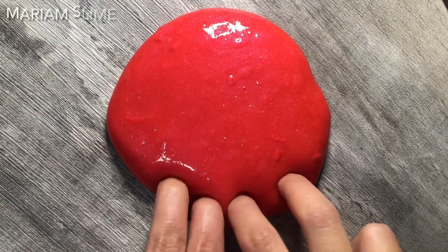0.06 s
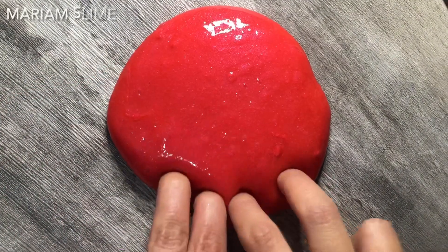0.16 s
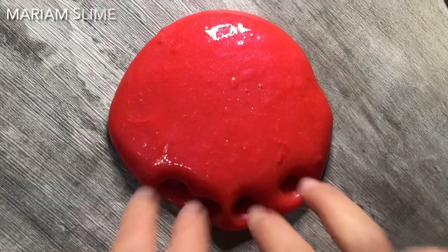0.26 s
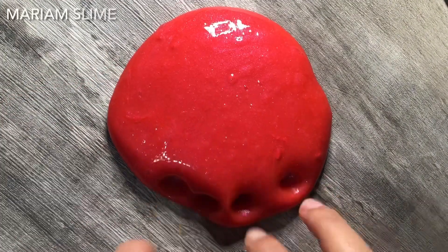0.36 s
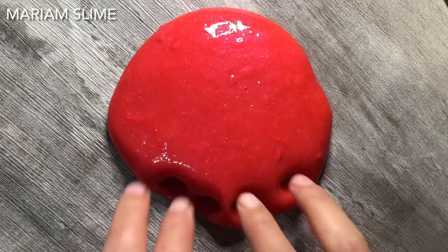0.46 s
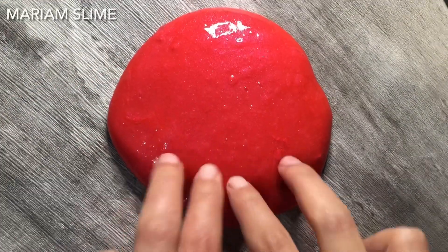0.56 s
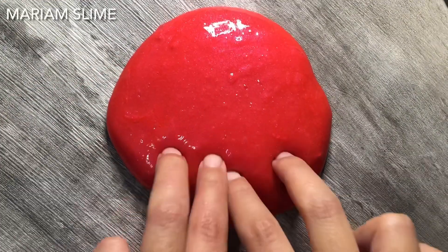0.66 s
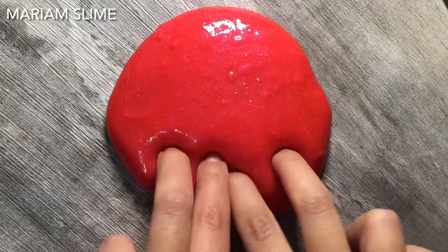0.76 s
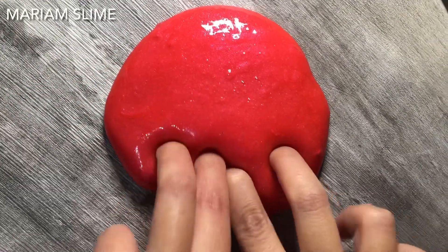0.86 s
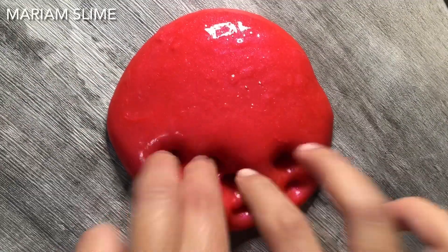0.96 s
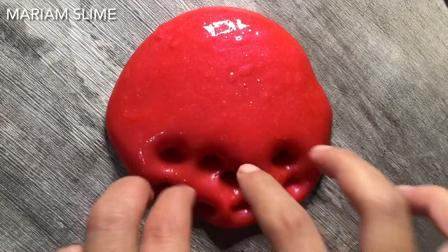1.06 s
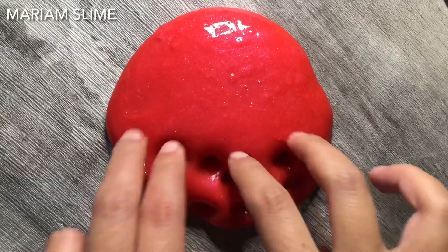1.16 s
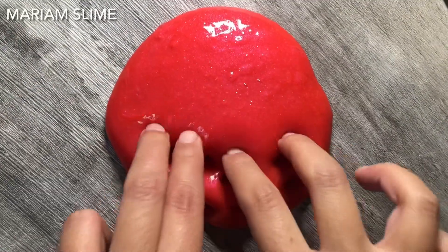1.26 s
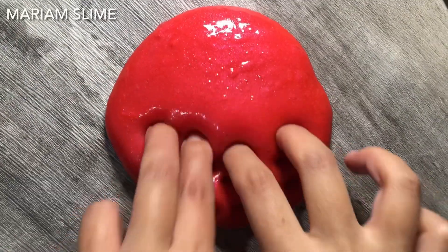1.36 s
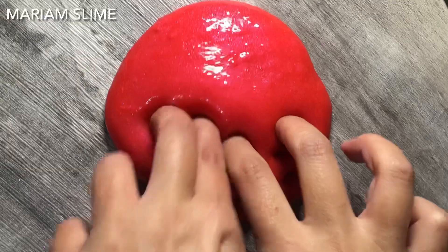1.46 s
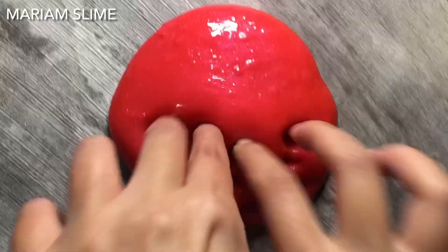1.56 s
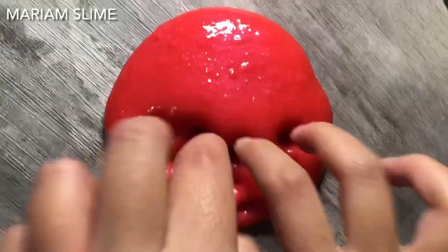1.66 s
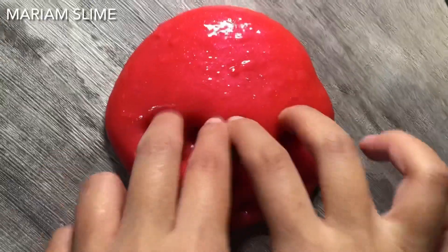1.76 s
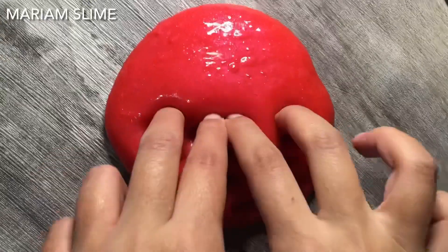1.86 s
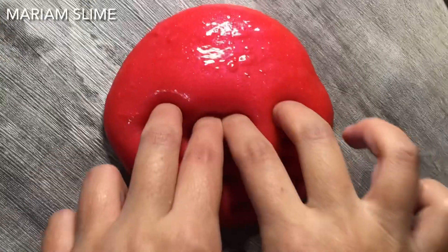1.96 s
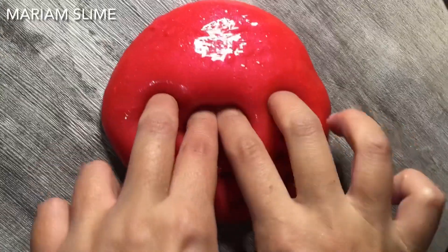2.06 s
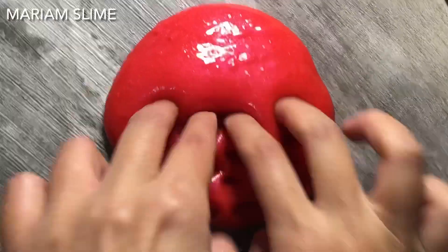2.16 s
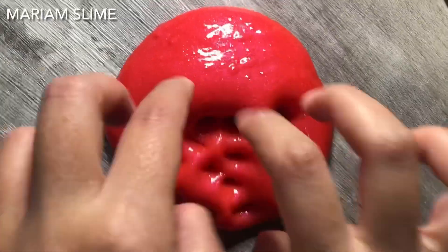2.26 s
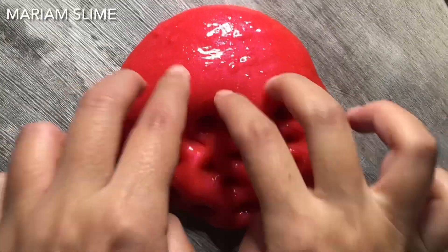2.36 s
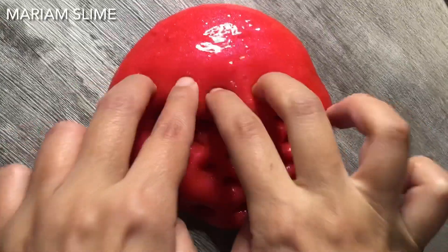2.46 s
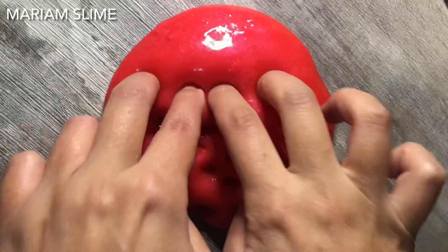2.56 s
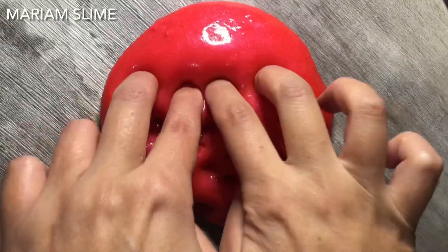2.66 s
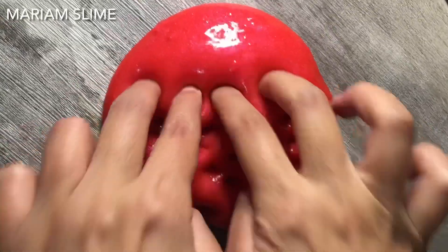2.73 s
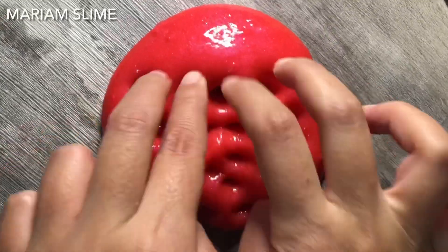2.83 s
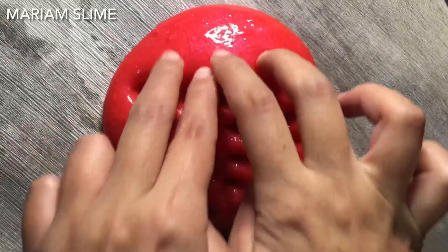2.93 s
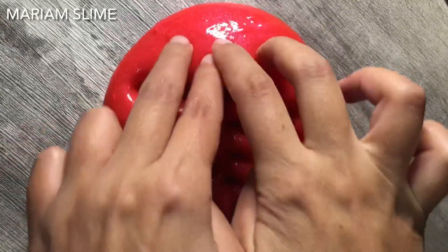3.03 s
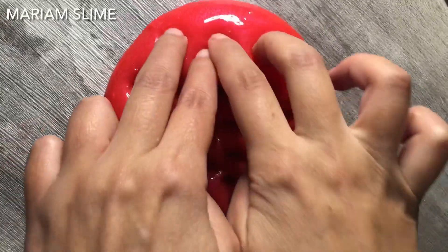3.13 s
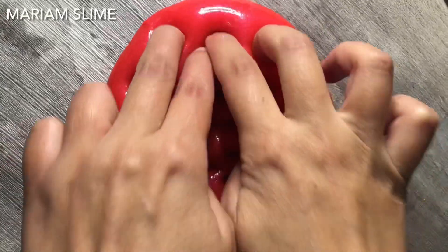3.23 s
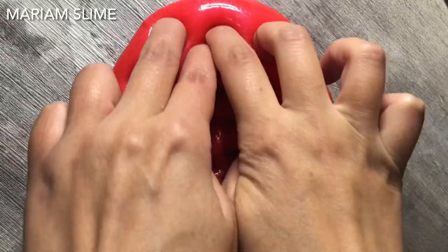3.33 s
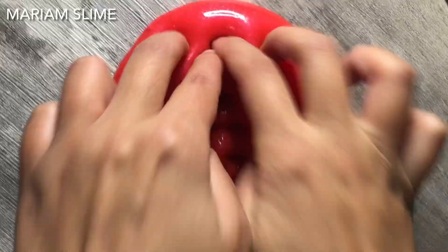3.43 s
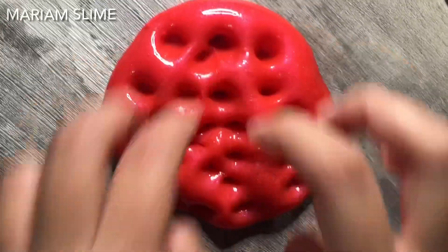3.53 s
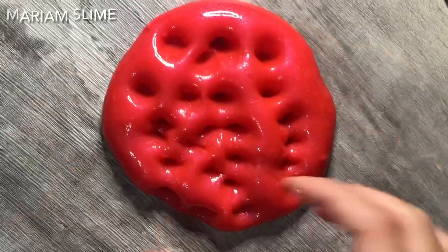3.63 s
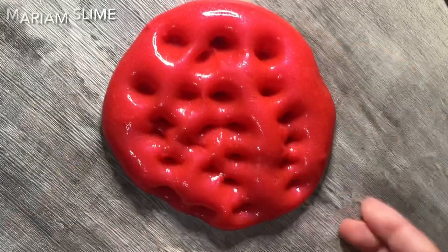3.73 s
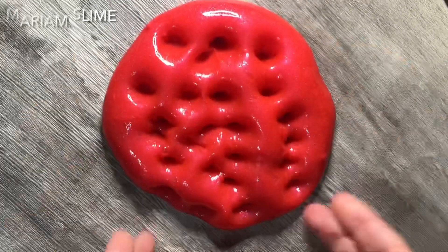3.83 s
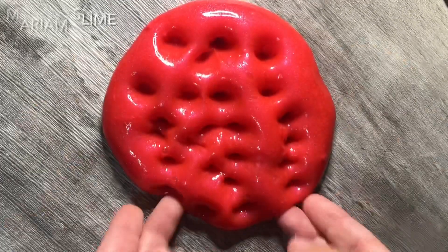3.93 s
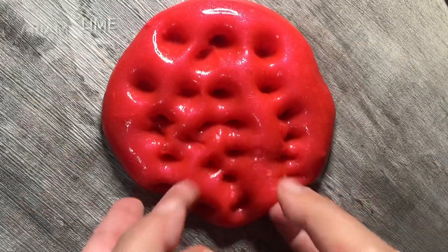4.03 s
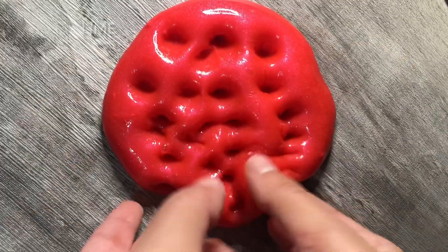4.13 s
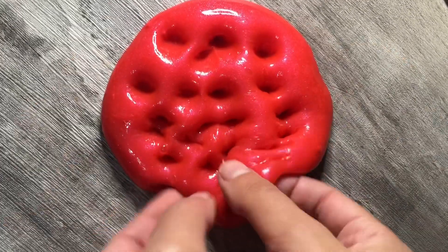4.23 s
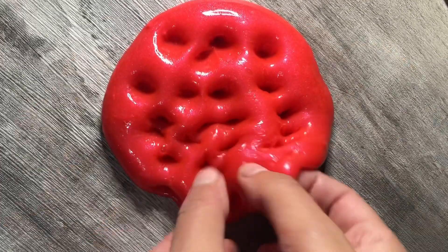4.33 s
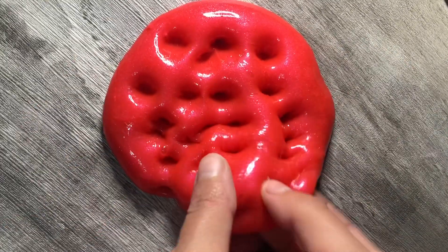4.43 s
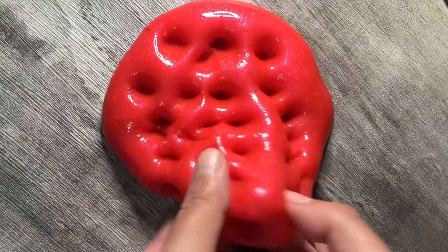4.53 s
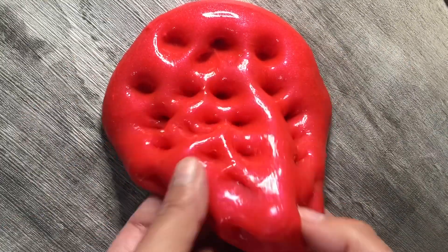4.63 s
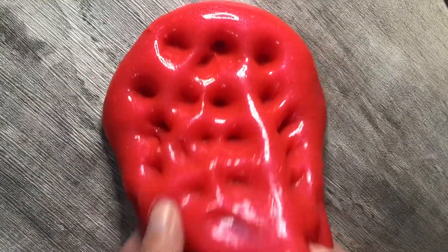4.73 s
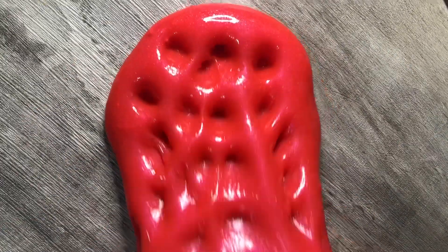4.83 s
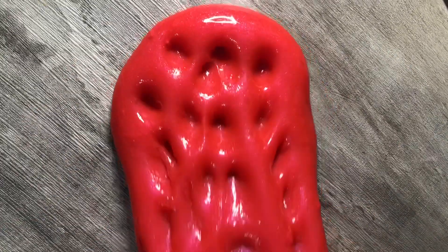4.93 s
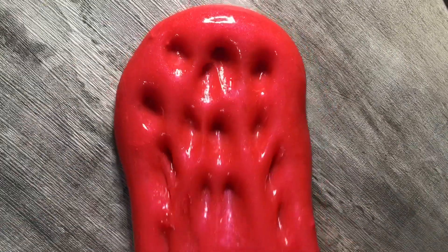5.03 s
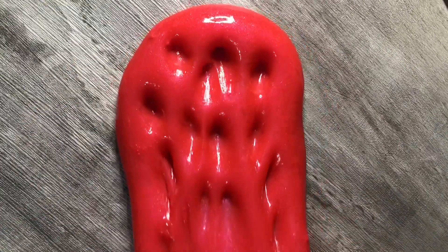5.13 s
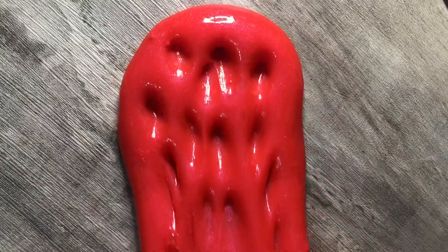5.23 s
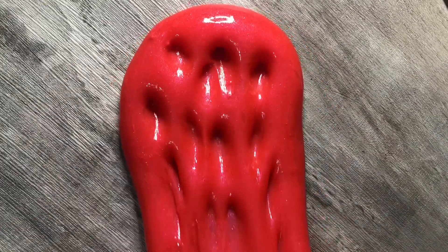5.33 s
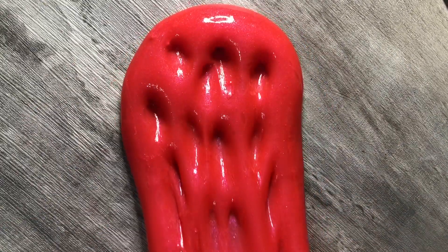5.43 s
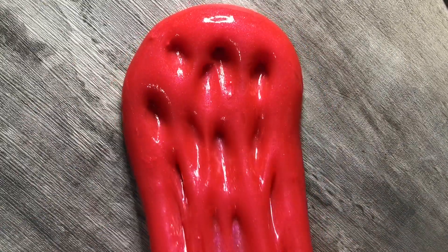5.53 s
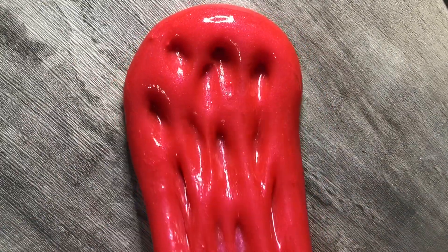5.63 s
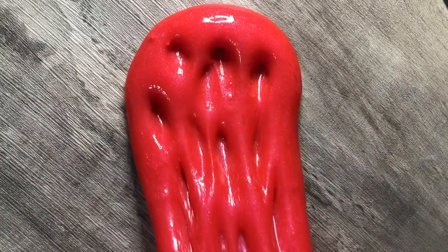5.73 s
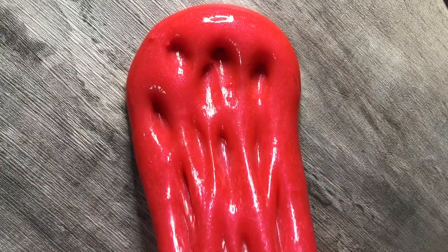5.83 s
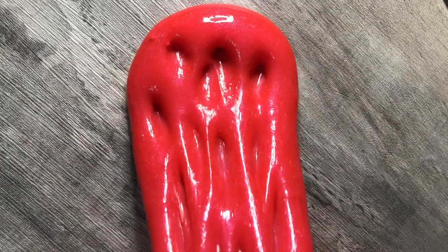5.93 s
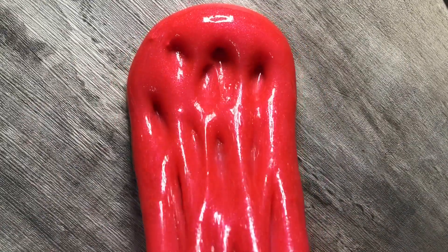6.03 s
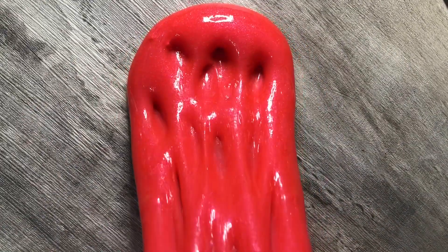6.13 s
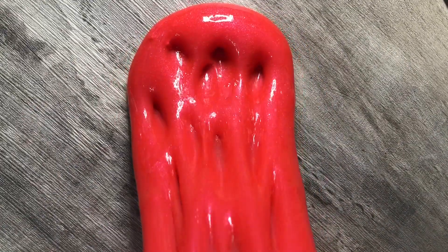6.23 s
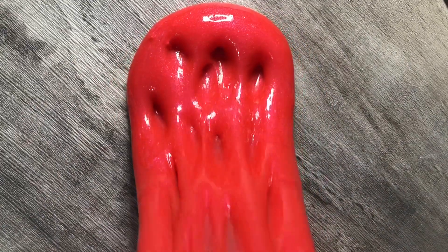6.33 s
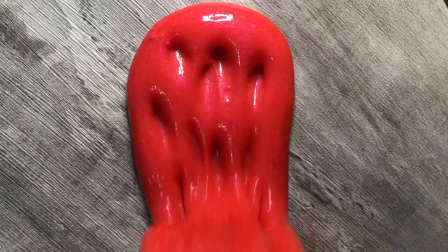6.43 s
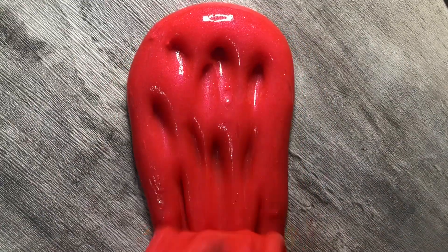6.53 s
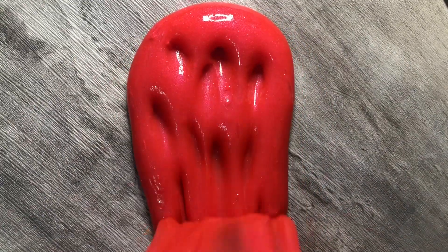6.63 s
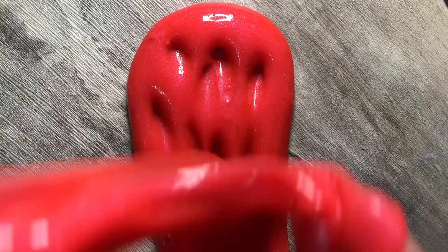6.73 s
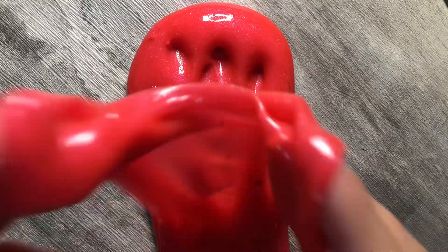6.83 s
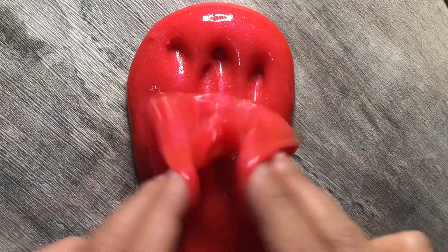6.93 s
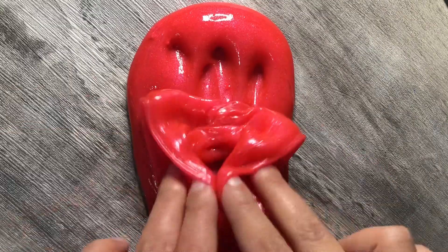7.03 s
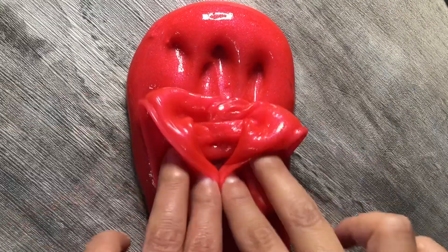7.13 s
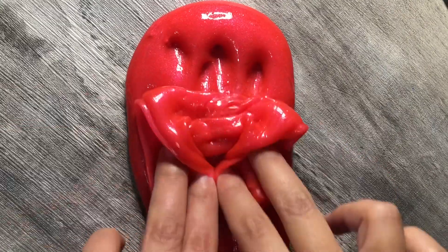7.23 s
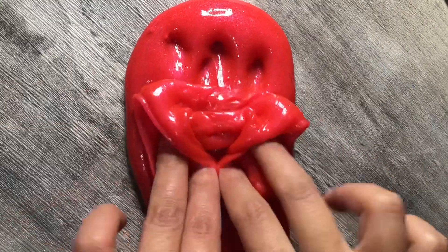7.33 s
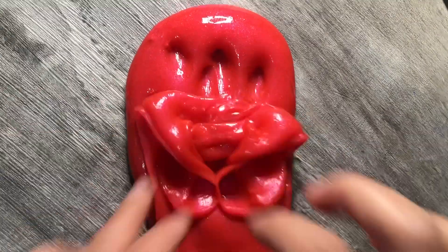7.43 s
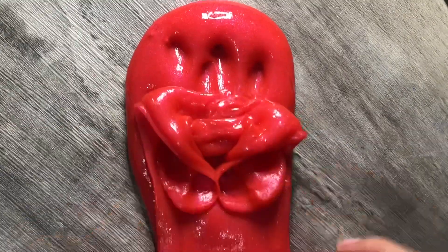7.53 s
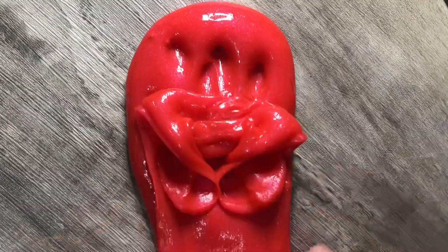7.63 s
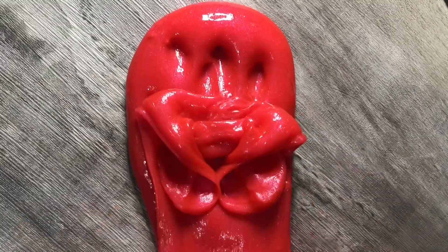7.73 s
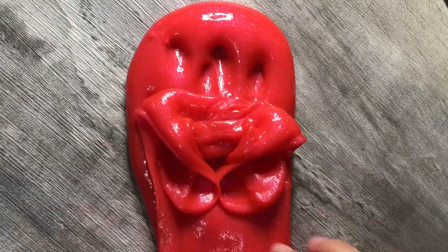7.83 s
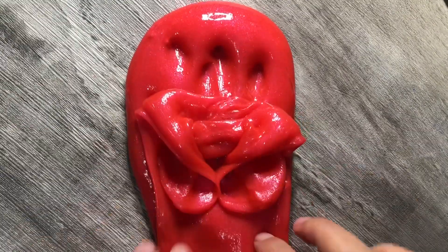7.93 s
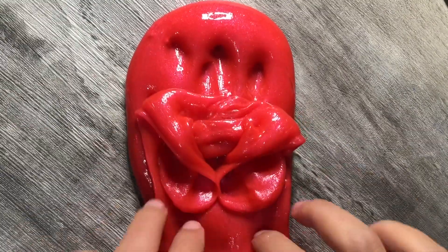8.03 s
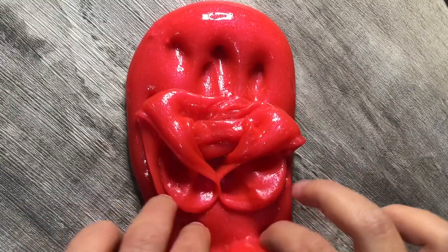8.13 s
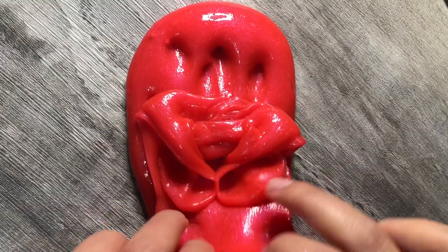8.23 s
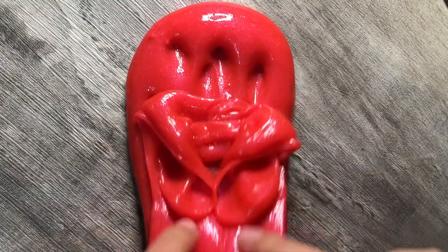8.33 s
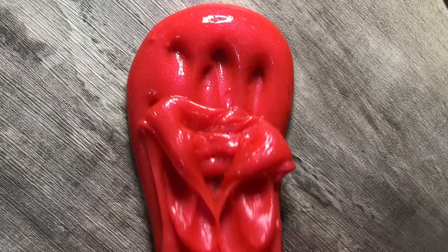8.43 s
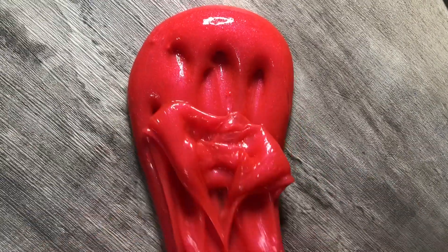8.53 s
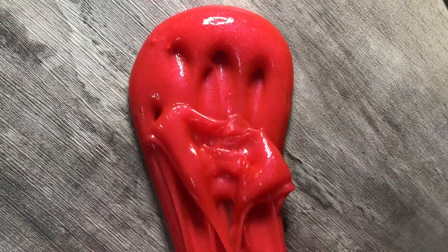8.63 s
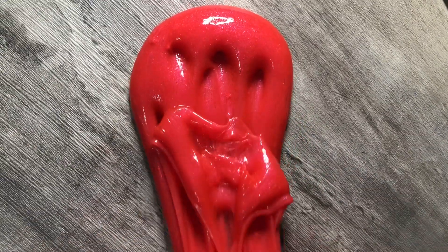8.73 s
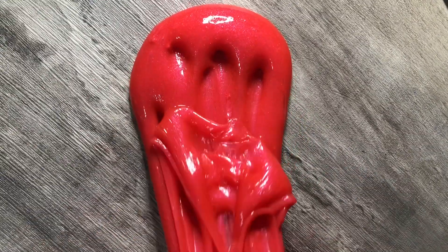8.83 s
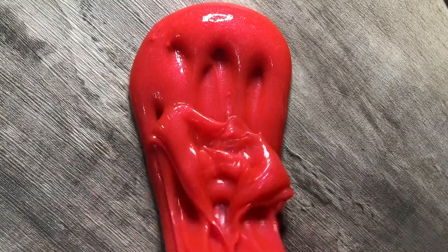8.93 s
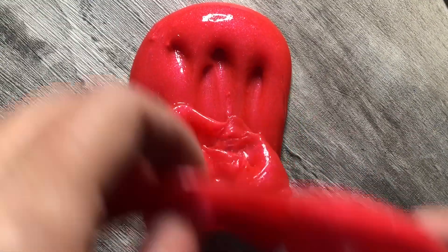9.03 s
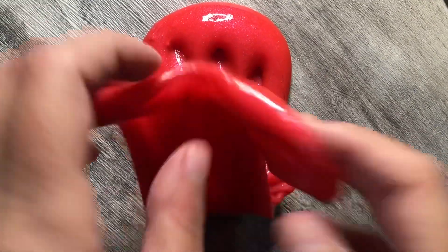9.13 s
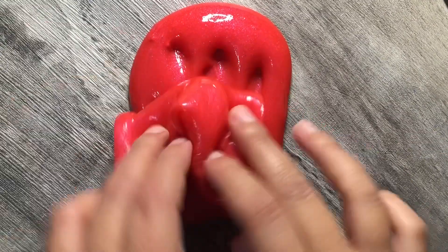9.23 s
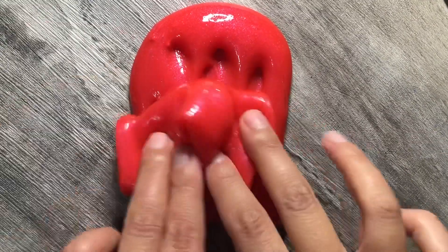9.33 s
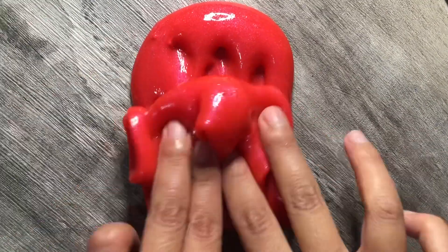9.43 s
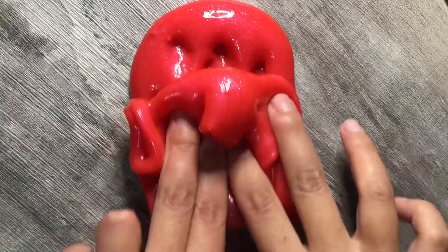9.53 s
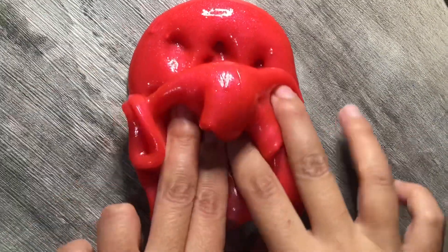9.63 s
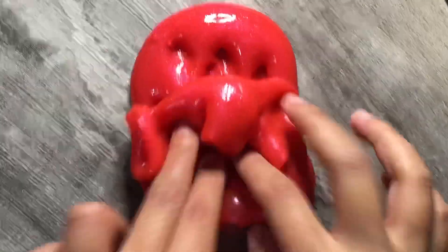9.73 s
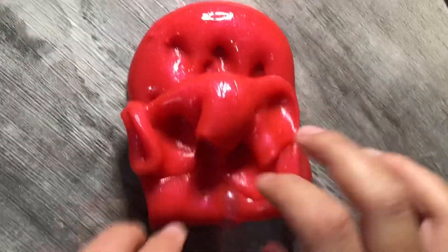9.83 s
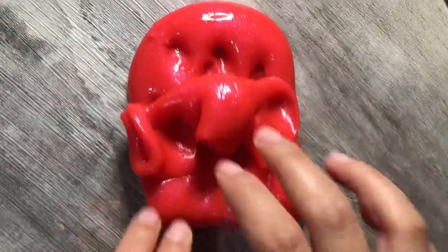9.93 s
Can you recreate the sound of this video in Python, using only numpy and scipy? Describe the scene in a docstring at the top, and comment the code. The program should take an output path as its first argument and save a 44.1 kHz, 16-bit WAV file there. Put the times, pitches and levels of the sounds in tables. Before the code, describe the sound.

Close, crisp clicks and bubbly pops from poked slime come in bursts, fading to faint stretching crackle, with small snaps late over low hum.

```python
"""Slime poked on a table

Fingers poke, stretch and fold sticky slime in a small quiet room. Films snap (noise bursts in a resonance),
pockets pop (gliding damped sines), air squirts and resonant crackles slide in pitch (resonant random grains).
Peeling slime fizzes and crackles, hands drag on the table (coloured grains), and a dull rush stops short.
Echoes, the table's ringing and a sympathetic tone follow the pokes; room air and an appliance hum lie below."""
import sys
import numpy as np
from scipy import signal
from scipy.fft import rfft, irfft
from scipy.io import wavfile

SR = 44100
rng = np.random.default_rng(int(sys.argv[2]) if len(sys.argv) > 2 else 0)


def unload_audio(sound):
    """Save the sound as a 16-bit wav file, at the path given as the first command line argument."""
    columns = np.transpose(np.atleast_2d(sound))
    # keep every value between -1 and 1, then stretch to whole-number steps
    steps = np.round(np.clip(columns, -1, 1) * 32767)
    wavfile.write(sys.argv[1], SR, steps.astype(np.int16))


N = 440118

# loudest films snapping: t/s, click peak level/dB, centre f/Hz
FILM_SNAPS = [(0.126, -35, 7000), (0.141, -41, 7000), (.8315, -27, 12100), (0.8364, -15, 10500),
              (0.858, -21, 8950), (1.445, -30, 10900), (1.4615, -20, 3900), (2.0597, -21.5, 10000),
              (2.0875, -15, 12900), (2.092, -10.5, 12100), (2.095, -1, 12000), (2.637, -10.5, 9800),
              (2.6437, -13.5, 10160), (2.6468, -18, 11000), (2.6643, -18, 7300), (3.3215, -21, 10100),
              (3.335, -20, 8920), (3.589, -43.5, 3500), (3.927, -27, 7050), (4.312, -35.5, 3260),
              (7.0258, -47, 6960), (7.1498, -36.5, 5770), (7.2653, -31, 8000), (7.2825, -28, 5730),
              (8.984, -42, 3495), (9.357, -34.5, 5600), (9.631, -20.5, 4370), (9.6515, -27, 5960)]


def from_db(db):
    """Decibels to gain."""
    return 10 ** (np.asarray(db) / 20)


def decay(t, t60_s):
    """Exponential fade, 60 dB per t60."""
    return from_db(-60 * t / t60_s)


def rms_one(x):
    """Scale to rms 1."""
    return x / np.sqrt(np.mean(x ** 2) + 1e-20)


def add(out, start_s, sound):
    """Mix a sound in at its start time."""
    at = max(int(start_s * SR), 0)
    out[at:at + len(sound)] += sound[:N - at]


def coloured(x, spectrum):
    """Shape a noise by a relative spectrum, log-interpolated in frequency; rms 1."""
    hz, db = np.transpose(spectrum)
    bins_hz = np.maximum(np.fft.rfftfreq(len(x), 1 / SR), 1)
    gain = from_db(np.interp(np.log(bins_hz), np.log(hz), db, left=-200))
    return rms_one(irfft(rfft(x) * gain, len(x)))


def resonate(x, hz, width_hz):
    """Two-pole resonance."""
    r = np.exp(-np.pi * width_hz / SR)
    zeros = [(1 - r * r) / 2, 0, (r * r - 1) / 2]
    poles = [1, -2 * r * np.cos(2 * np.pi * hz / SR), r * r]
    return signal.lfilter(zeros, poles, x)


def wander(size, rate_hz):
    """Smooth chance: straight lines between normal random knots of spread 1."""
    place = np.arange(size) * rate_hz / SR
    knots = rng.standard_normal(size // 8 + 2)
    return np.interp(place, np.arange(len(knots)), knots)


def grains(size, per_s, spread_db, clump_db=0):
    """Tiny ruptures at random moments, a few much larger, optionally in clumps; rms 1."""
    excess_db = spread_db * np.minimum(rng.exponential(1, size), 4)
    sizes = from_db(excess_db + clump_db * wander(size, rate_hz=350))
    happens = rng.random(size) < per_s / SR
    return rms_one(happens * sizes * rng.standard_normal(size))


def stroke(start_s, rise_s, hold_s, release_s):
    """A hand movement as gain per sample: it builds, holds and lets go."""
    t = np.arange(N) / SR - start_s
    release = 1 - (t - rise_s - hold_s) / release_s
    return np.clip(np.minimum(t / rise_s, release), 0, 1)


def snaps(relative_width=0.5, lead_in_db=-20, lead_in_t60_s=0.0027, tear_db=-19, tear_t60_s=0.012):
    """A faint noise swells for a few milliseconds into each snap's sharp click, which then fades over a few
    milliseconds."""
    out, lead = np.zeros(N), SR // 200
    t = np.arange(-lead, SR // 40) / SR
    for start_s, db, hz in FILM_SNAPS:
        lead_in_level_db = lead_in_db + 60 * t / lead_in_t60_s
        tear_level_db = tear_db - 60 * t / tear_t60_s
        force = from_db(np.where(t < 0, lead_in_level_db, tear_level_db)) * rng.standard_normal(len(t))
        force[lead] = 1   # the click
        click = resonate(force, hz, relative_width * hz)
        add(out, start_s + t[0], from_db(db) * click / np.abs(click).max())
    return out


def pocket(t, first_hz, last_hz, t60_s, glide_share=0.12, rise_s=0.00036, wobble_hz=1500, wobble=0.15):
    """An opened pocket rings like a small bottle, gliding and wobbling as its soft walls give way."""
    glide_hz = last_hz * (first_hz / last_hz) ** np.exp(-t / (glide_share * t60_s))
    hz = glide_hz * (1 + wobble * wander(len(t), wobble_hz))
    swell = (1 - np.exp(-t / rise_s)) * decay(t, t60_s)
    return swell / swell.max() * np.sin(2 * np.pi * np.cumsum(hz) / SR)


def pops(slap_db=-13, slap_t60_s=0.011, slap_hz=900, thud_db=-22, thud_hz=300, thud_t60_s=0.021):
    """Each pocket rings, its walls slap shut and the lump recoils on the table."""
    # air pockets: t/s, ring level/dB, f it settles towards/Hz, t60/s
    pockets = [(.0262, -43, 434, 0.013), (.110, -45, 403, 0.023), (0.124, -33, 1174, .075),
               (.1305, -35.5, 1945, 0.045), (.142, -38, 394, 0.036), (0.3905, -42.5, 330, 0.013),
               (.8355, -19.5, 1070, 0.0074), (.839, -33.5, 452, 0.034), (.847, -30, 1160, 0.097),
               (.858, -27.5, 1070, 0.023), (1.352, -41.5, 430, 0.012), (1.37, -33.5, 613, 0.0096),
               (1.455, -24, 920, 0.015), (1.461, -25.5, 507, 0.025), (1.479, -24.5, 1090, 0.028),
               (1.948, -60, 891, 0.019), (2.061, -34, 428, 0.026), (2.0955, -14.5, 946, .0098),
               (2.109, -31, 895, 0.029), (2.6379, -26.5, 816, 0.026), (2.642, -31.5, 523, 0.029),
               (2.651, -28, 1126, .024), (2.666, -24, 920, 0.027), (2.683, -37, 859, .041),
               (3.323, -23.5, 1196, 0.023), (3.332, -36, 883, 0.093), (3.391, -50.5, 2180, .024),
               (3.939, -43, 530, 0.013), (4.110, -41.5, 332, 0.017), (4.152, -44, 407, 0.013),
               (4.301, -46, 1530, 0.028), (4.425, -47, 540, 0.017), (7.047, -39, 990, 0.03),
               (7.049, -56.5, 477, .058), (7.283, -48, 460, .02), (9.116, -50, 1297, .012),
               (9.357, -41.5, 1196, .008), (9.367, -31.5, 884, 0.0116), (9.632, -42.5, 452, 0.029)]
    # a pocket opens small and high, then sinks; the briefer, the further
    sink_hz, sink_t60_s, sink_power, sink_max_hz = 1216, 0.015, 1.8, 2660   # sink_hz applies at sink_t60_s
    out, t = np.zeros(N), np.arange(SR // 12) / SR
    for start_s, db, hz, t60_s in pockets:
        drop_hz = min(sink_hz * (sink_t60_s / t60_s) ** sink_power, sink_max_hz)
        ring = pocket(t, hz + drop_hz, hz, t60_s)
        slap_noise = rms_one(resonate(rng.standard_normal(len(t)), slap_hz, width_hz=4400))
        slap = from_db(slap_db) * decay(t, slap_t60_s) * slap_noise
        thud = from_db(thud_db) * decay(t, thud_t60_s) * np.sin(2 * np.pi * thud_hz * t)
        add(out, start_s, from_db(db) * (ring + slap + thud))
    # high-pass: keeps low thumps from the sudden sine onsets out of the pops
    return signal.sosfilt(signal.butter(3, 240, "high", fs=SR, output="sos"), out)


def squirts(fade_t60_s=0.03, relative_width=1.024, body_hz=1350, body_width_hz=2900, rise_share=0.05):
    """Escaping air tears a burst of tiny films in a narrow fold; the lump adds a lower body."""
    # air through wet folds: t/s, length/s, fold level/dB, fold centre f/Hz, body level re fold/dB
    bursts = [(0.121, 0.034, -53, 4800, 3), (0.829, 0.048, -49.5, 7800, 3), (1.365, 0.028, -71, 4860, 12),
              (1.45, 0.049, -53, 3870, 5.5), (1.944, 0.018, -74.5, 4640, 14),
              (2.055, 0.053, -61, 11000, 10), (2.0922, 0.0048, -28, 11200, -2.5),
              (2.632, 0.031, -43.5, 8880, 7.5), (3.3203, 0.013, -36.5, 8000, 0),
              (3.389, 0.0064, -66, 4970, 6.5), (6.838, 0.032, -70.5, 5080, 1),
              (7.032, 0.0099, -63.5, 6940, 3), (7.244, 0.066, -61.5, 6900, .5),
              (7.262, 0.028, -55.5, 6760, 2.5), (9.113, 0.0033, -62, 5080, -0.5),
              (9.366, 0.0014, -54, 2000, 2.5), (9.605, 0.053, -53, 6460, 0.5)]
    out, t = np.zeros(N), np.arange(SR // 6) / SR
    for start_s, length_s, db, hz, body_db in bursts:
        tears = grains(len(t), per_s=12000, spread_db=2.5, clump_db=3.5)
        fold = rms_one(resonate(tears, hz, relative_width * hz))
        body = from_db(body_db) * rms_one(resonate(tears, body_hz, body_width_hz))
        rise = 1 - np.exp(-t / (rise_share * length_s))
        flow = rise * decay(np.maximum(t - length_s, 0), fade_t60_s)
        add(out, start_s, from_db(db) * flow * (fold + body))
    return out


def resonant_crackles(edge_s=0.013):
    """Random grains excite a narrow resonance whose pitch slides, then a broad fixed one."""
    # resonant crackles: finger smears, and a snap's narrow ring near 4.3 kHz at 9.62 s
    # columns: t/s, length/s, level/dB, first f/Hz, last f/Hz
    slides = [(3.89, 0.12, -66, 5170, 2750), (4.013, 0.088, -61, 3400, 2230),
              (4.234, .052, -61, 2540, 1890), (4.29, .17, -64, 1800, 1600),
              (4.501, .034, -59.5, 1620, 1590), (6.452, .043, -68.5, 2200, 2435),
              (7.969, 0.26, -63.5, 3330, 2990), (8.038, 0.115, -67.5, 1240, 1330),
              (8.099, 0.07, -62, 4600, 4800), (8.905, 0.11, -79, 3510, 3420),
              (9.624, 0.031, -40, 4300, 4250)]
    out = np.zeros(N)
    for start_s, length_s, db, first_hz, last_hz in slides:
        t = np.arange(int(length_s * SR)) / SR
        hz = np.geomspace(first_hz, last_hz, len(t))
        turn = np.exp(2j * np.pi * np.cumsum(hz) / SR)
        r = np.exp(-np.pi * 0.3 * first_hz / SR)
        crackle = grains(len(t), per_s=3500, spread_db=2, clump_db=3)
        # a resonance that follows the pitch
        ringing = (turn * signal.lfilter([1], [1, -r], crackle / turn)).imag
        edges = np.minimum(np.minimum(t, length_s - t) / edge_s, 1)
        add(out, start_s, from_db(db) * edges * rms_one(resonate(ringing, first_hz, first_hz)))
    return out


def sympathy():
    """Every snap feeds energy to one slowly fading tone; only the hardest make it audible."""
    # something nearby that rings along: f/Hz, level re snap/dB, t60/s
    hz, relative_db, t60_s = (956, -67, 1.5)
    energy = np.zeros(N)
    for start_s, db, _ in FILM_SNAPS:
        add(energy, start_s, [from_db(db + relative_db) ** 2])
    stored = signal.lfilter([1], [1, -decay(1 / SR, t60_s) ** 2], energy)
    return np.sqrt(stored) * np.sin(2 * np.pi * hz * np.arange(N) / SR)


def peeling(crackle_trim_db=-3):
    """Stretched slime bursts microscopic bubbles (fizz) and larger wet ones that ring a few cycles."""
    # pulls: t/s, rise/s, hold/s, release/s, fizz level/dB, wet crackle level before trim/dB
    pulls = [(3.88, 0.024, 0.23, 0.13, -68, -64.5), (4.212, 0.028, 0.2, 0.062, -63.5, -60.5),
             (4.493, 0.022, 0.0054, 0.034, -64.5, -62), (4.53, 0.044, 0.22, 0.32, -75.5, -75.5),
             (4.85, 0.43, 0.028, 0.47, -68, -66.5), (6.382, 0.092, .01, 0.097, -72.5, -65.5),
             (7.351, .08, .24, .1, -80, -94), (7.91, 0.17, 0.099, 0.097, -63.5, -58),
             (8.275, .08, .28, 0.17, -72.5, -85.5), (8.92, 0.045, .01, 0.026, -65, -77),
             (9.49, 0.11, 0.017, .04, -64.5, -63)]
    # fizz spectrum: f/Hz, relative level/dB
    fizz_colour = [(2060, -17), (3500, -5.5), (4000, -11), (4400, -6), (8530, -3.5), (13100, -9),
                   (16000, -17)]
    fizz = coloured(grains(N, per_s=7000, spread_db=1.5), fizz_colour)
    bubbles_hz = np.geomspace(1100, 4500, num=10)
    crackle = rms_one(sum(resonate(grains(N, per_s=180, spread_db=2), hz, 0.12 * hz) for hz in bubbles_hz))
    out = np.zeros(N)
    for start_s, rise_s, hold_s, release_s, fizz_db, wet_db in pulls:
        sound = from_db(fizz_db) * fizz + from_db(wet_db + crackle_trim_db) * crackle
        out += stroke(start_s, rise_s, hold_s, release_s) * sound
    return out


def drag():
    """Skin sticks and slips on the table top: clumped grains, scaled by hand pressure."""
    # hand movements: t/s, rise/s, hold/s, release/s, level/dB
    rubs = [(3.585, 0.0045, .005, 0.049, -54), (3.622, 0.046, 0.053, 0.056, -54),
            (3.725, .045, 0.018, 0.097, -45), (9.479, .04, .01, 0.062, -61),
            (9.915, 0.017, .03, 0.081, -62)]
    # rubbing spectrum: f/Hz, relative level/dB
    rub_colour = [(120, -28), (200, -11), (252, -23.5), (328, 5), (420, -12.5), (554, -5), (894, -16.5),
                  (1030, -22), (1260, -15.5), (1510, -28), (1960, -23), (3270, -30.5), (8000, -39.5),
                  (10400, -42), (17600, -120)]
    slips = grains(N, per_s=2500, spread_db=1.5, clump_db=3)
    pressure = sum(from_db(db) * stroke(start_s, rise_s, hold_s, release_s)
                   for start_s, rise_s, hold_s, release_s, db in rubs)
    return pressure * coloured(slips, rub_colour)


def rush(end_s=0.393, release_s=0.005, level_db=-59):
    """A steady dull rush of coloured noise that stops short."""
    # rush spectrum: f/Hz, relative level/dB
    rush_colour = [(120, -40), (200, 1), (237, 5), (298, -1.5), (598, 6.5), (957, 3.5), (2180, -4),
                   (3750, -22), (6000, -24), (7800, -66), (13200, -120)]
    fade = np.clip(1 - (np.arange(N) / SR - end_s) / release_s, 0, 1)
    return from_db(level_db) * fade * coloured(rng.standard_normal(N), rush_colour)


def room(x, scatter_db=-11, scatter_t60_s=0.11, build_s=0.011, tail_db=-30, tail_t60_s=0.28, wall_cut_hz=2100):
    """Dull near reflections, the ringing table, a short bright scatter and a faint dark tail."""
    # reflections off nearby surfaces: delay/s, level before the wall low-pass/dB
    reflections = [(.0036, -8), (.0131, -14)]
    # scatter and tail spectra: f/Hz, relative level/dB
    scatter_colour = [(200, -1.5), (350, 10), (1300, -8), (2500, -10), (6000, -8.5), (12000, -11),
                      (16000, -8.5)]
    tail_colour = [(200, -3.5), (400, 7.5), (1000, -9), (2500, -9), (6000, -19), (16000, -40)]
    # table top modes: f/Hz, level before scaling by f/dB, t60/s
    table_modes = [(359, -30, 0.19), (473, -31, 0.13), (525, -30.5, 0.18), (830, -36.5, 0.047),
                   (877, -39.5, 0.1312), (1196.4, -43, 0.14)]
    t, echoes = np.arange(SR) / SR, np.zeros(SR)
    for delay_s, db in reflections:
        add(echoes, delay_s, [from_db(db)])
    response = signal.lfilter(*signal.butter(1, wall_cut_hz, fs=SR), echoes)
    layers = ((scatter_colour, scatter_db, scatter_t60_s), (tail_colour, tail_db, tail_t60_s))
    for colour, db, t60_s in layers:
        envelope = decay(t, t60_s) * (1 - np.exp(-t / build_s))
        diffuse = coloured(rng.standard_normal(SR), colour) * envelope
        response += from_db(db) * diffuse / np.linalg.norm(diffuse)
    for hz, db, t60_s in table_modes:
        omega = 2 * np.pi * hz
        response += from_db(db) * decay(t, t60_s) * np.cos(omega * t) * omega / SR
    return x + signal.fftconvolve(x, response)[:N]


def background(air_db=-64.5, waver=0.37):
    """Room air as coloured noise; an appliance hum as sines wavering in level and phase."""
    # hum tones: f/Hz, rms level before wavering/dB
    hum_tones = [(54, -71.5), (85, -74.5), (119, -71.5)]
    # air spectrum: f/Hz, relative level/dB
    air_colour = [(15, -46), (25, -17.5), (43, -8.5), (117, -2.5), (153, -10.5), (212, -13), (309, -15.5),
                  (354, -19.5), (394, -18), (775, -26), (936, -25.5), (1020, -29), (9840, -37),
                  (14800, -38.5), (16000, -47)]
    t, hum = np.arange(N) / SR, np.zeros(N)
    for hz, db in hum_tones:
        level = from_db(db) * np.sqrt(2) * (1 + waver * wander(N, rate_hz=42))
        hum += level * np.sin(2 * np.pi * hz * t + 0.9 * wander(N, rate_hz=14))
    return hum + from_db(air_db) * coloured(rng.standard_normal(N), air_colour)


def scene():
    """The slime close by, over the quiet room."""
    pokes = room(snaps() + pops() + squirts() + resonant_crackles()) + sympathy()
    return (pokes + peeling() + drag() + rush() + background())[None]


def record(dry):
    """The microphone drops the deepest rumble; the top is cut steeply."""
    thin = signal.sosfilt(signal.butter(2, 32, "high", fs=SR, output="sos"), dry)
    return signal.sosfilt(signal.ellip(10, 0.1, 80, 16000, fs=SR, output="sos"), thin)


dry = scene()
out = record(dry)
unload_audio(out)
```